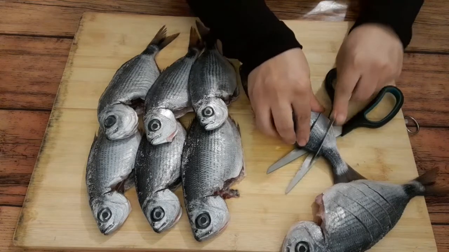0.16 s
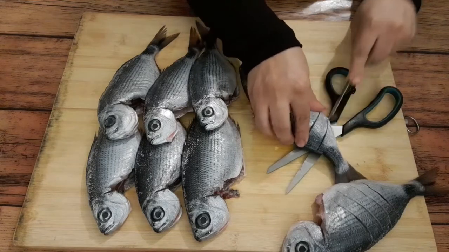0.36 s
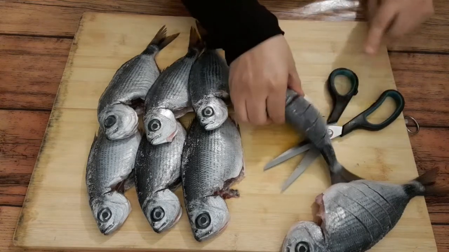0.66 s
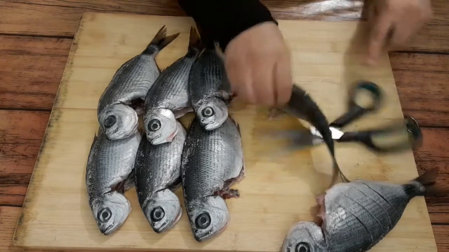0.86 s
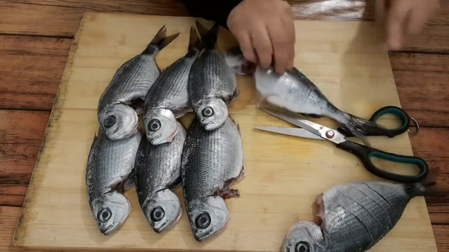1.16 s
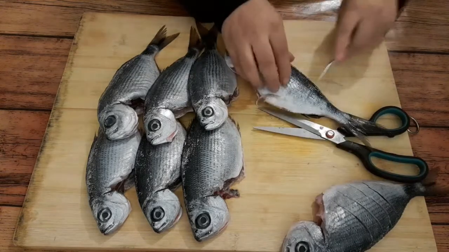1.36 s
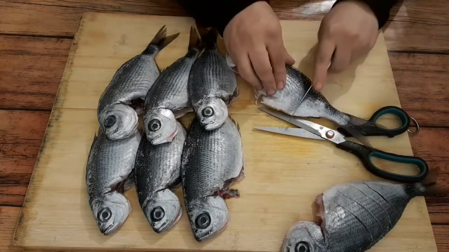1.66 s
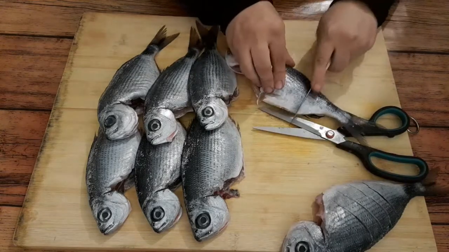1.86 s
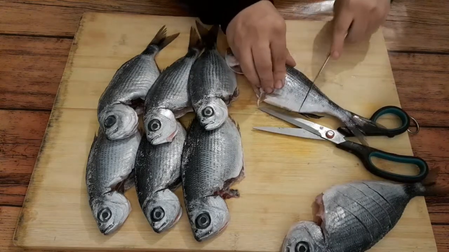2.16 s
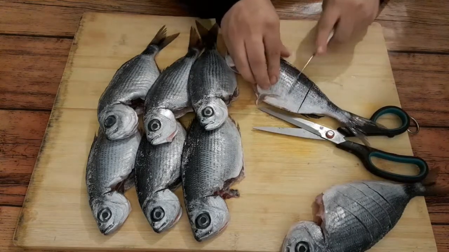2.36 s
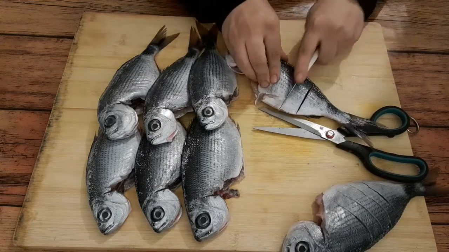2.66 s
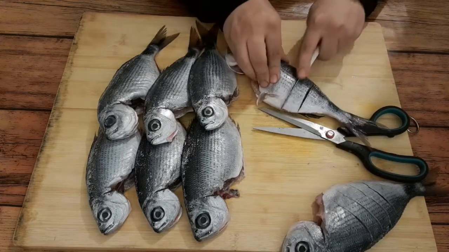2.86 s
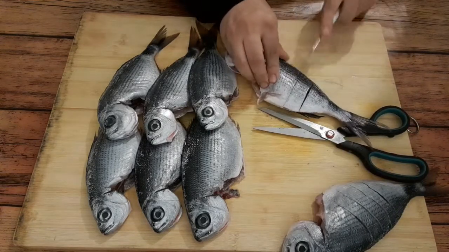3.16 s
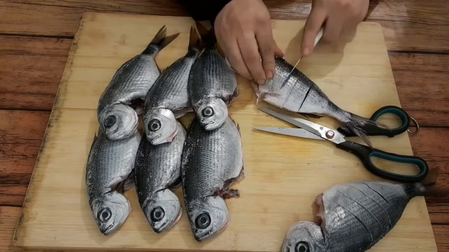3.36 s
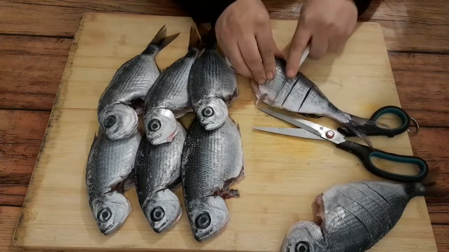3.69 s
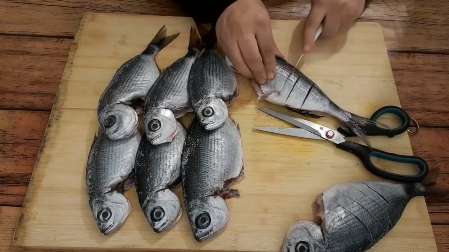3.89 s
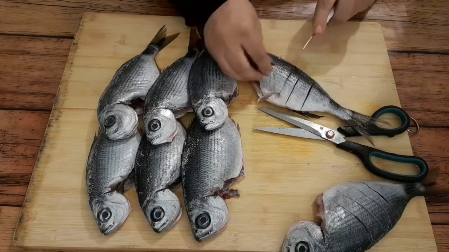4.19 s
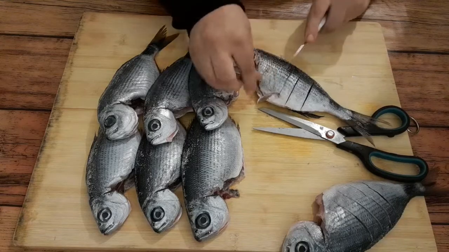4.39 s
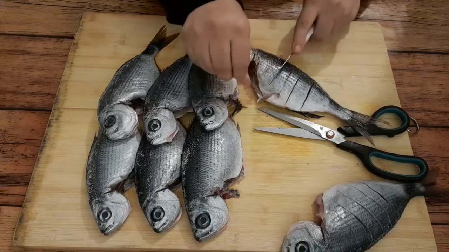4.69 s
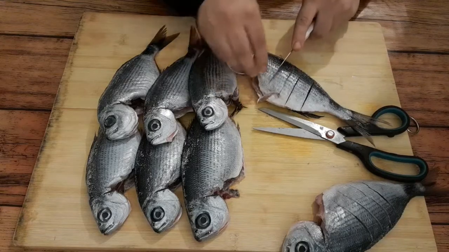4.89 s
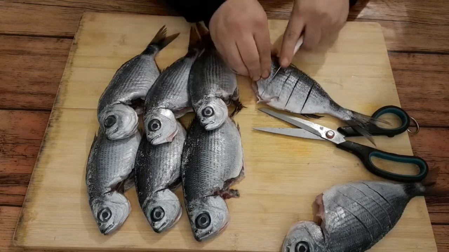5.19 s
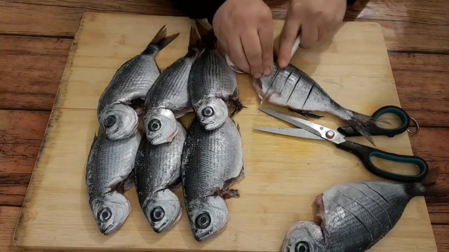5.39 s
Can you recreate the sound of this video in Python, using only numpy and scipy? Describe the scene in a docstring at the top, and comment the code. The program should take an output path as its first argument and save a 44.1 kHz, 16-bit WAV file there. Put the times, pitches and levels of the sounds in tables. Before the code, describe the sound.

Close handling of fish on a wooden board: wet drags, woody thumps, brief scissor buzz and light blade cuts over faint motor hum.

```python
"""Scoring fish in a quiet kitchen

A knife scores small fish on a wooden board, close under a two-port microphone.
The blade hisses through skin as shaped noise and ticks on scales and bone as short crackles.
Fish, hands and loose scissors knock, drag and rattle; board, table and steel ring as sets of fading sines.
A motor hums far off as wavering sines over steady air noise, and hits echo in the room.
"""
import sys
import numpy as np
from scipy import signal
from scipy.fft import rfft, irfft
from scipy.io import wavfile

SR = 44100
rng = np.random.default_rng(int(sys.argv[2]) if len(sys.argv) > 2 else 0)


def master_out(mix):
    """Clip the mix to full scale and print it as 16-bit PCM to the path in sys.argv[1]."""
    frames = np.transpose(np.atleast_2d(mix))
    ceiling = np.clip(frames, -1, 1)
    pcm = np.round(ceiling * 32767).astype(np.int16)
    wavfile.write(sys.argv[1], SR, pcm)


N = 244314   # length in samples
STEP = 40   # slow curves are worked out once every 40 samples

# How alike left and right are. Each row: pitch in Hz, likeness (0 unrelated, 1 the same).
LEFT_RIGHT_LIKENESS = [(25, 0.32), (60, 0.59), (125, 0.82), (250, 0.33), (500, 0.62), (1000, 0.029),
                       (2000, 0.037), (16000, 0.015)]


def coloured(spectrum, grain=1):
    """Stereo noise shaped by a spectrum, its sides alike by band; grain swells both together; rms 1."""
    hz = np.maximum(np.arange(N // 2 + 1) * SR / N, 1)
    mid, side = rfft(rng.standard_normal((2, N)) * grain)
    alike = np.clip(at_hz(LEFT_RIGHT_LIKENESS, hz), -1, 1)
    shared = np.sqrt(1 + alike) * mid
    opposed = np.sqrt(1 - alike) * side * [[1], [-1]]
    return rms_one(irfft((shared + opposed) * from_db(at_hz(spectrum, hz)), N))


# Strokes of blade, fish and fingers. Each row: start in seconds, rise in seconds, hold in seconds,
# blade hiss, wet drag, board rub and table rumble levels in dB, favoured board pitch in Hz,
# favoured table pitch in Hz.
STROKES = [(0.0, 0.0017, 0.028, -63, -64, -57.5, -56.5, 550, 118),
           (0.073, 0.059, .11, -66, -65, -56.5, -52, 556, 161),
           (0.281, 0.0063, 0.13, -58.5, -55, -50.5, -41, 535, 178),
           (0.452, 0.026, 0.14, -64.5, -66.5, -61, -55.5, 563, 136),
           (0.637, 0.051, 0.093, -60.5, -69, -68, -63.5, 494, 118),
           (0.775, 0.012, 0.038, -65, -48.5, -70, -56, 700, 150),
           (0.829, 0.036, 0.047, -61, -52, -49, -48.5, 653, 151),
           (0.924, 0.022, 0.046, -56, -53, -44, -46, 720, 185),
           (1.022, 0.022, .03, -61, -62, -50.5, -51, 530, 140),
           (1.15, .02, 0.14, -73, -85, -75, -68, 480, 104),
           (1.293, 0.069, 0.092, -64, -72.5, -69, -64, 510, 103),
           (1.41, 0.042, .06, -69.5, -69.5, -63.5, -58.5, 500, 100),
           (1.526, .03, 0.084, -69.5, -71, -70.5, -56.5, 480, 99),
           (1.645, .02, 0.12, -69, -73, -68.5, -60.5, 520, 111),
           (1.859, 0.042, 0.063, -60, -66, -60, -64.5, 700, 145),
           (1.983, 0.032, 0.021, -60, -59, -55.5, -56, 690, 175),
           (2.087, 0.0047, 0.061, -64, -64.5, -56, -44, 460, 103),
           (2.195, 0.017, 0.13, -72, -71.5, -71.5, -59.5, 500, 101),
           (2.348, 0.017, 0.3, -76, -90, -87, -83, 475, 100),
           (2.63, .06, 0.016, -61, -71, -64, -69, 510, 210),
           (2.81, 0.043, 0.04, -58, -62, -53, -59, 650, 164),
           (2.9, 0.016, .03, -69, -69, -57.5, -61, 600, 158),
           (2.96, 0.0076, 0.095, -56, -67, -51, -47, 700, 145),
           (3.035, 0.025, 0.032, -64, -58, -55.5, -41.5, 740, 159),
           (3.128, 0.022, 0.068, -75, -73, -71, -67, 620, 130),
           (3.235, .02, 0.14, -78.5, -80, -96, -75, 467, 100),
           (3.413, 0.037, 0.11, -70.5, -78.5, -82, -84, 485, 128),
           (3.519, 0.028, 0.095, -67, -64.5, -63, -56.5, 600, 162),
           (3.68, 0.041, 0.088, -58.5, -53.5, -54.5, -52.5, 680, 142),
           (3.81, 0.017, 0.14, -66, -72, -72, -51.5, 910, 131),
           (3.919, 0.0053, 0.041, -61.5, -56.5, -78, -45.5, 590, 148),
           (3.986, 0.0083, .04, -66.5, -70.5, -76, -56, 612, 202),
           (4.09, 0.049, .3, -89, -79, -70.5, -66, 500, 184),
           (4.515, 0.019, 0.091, -106, -103, -78, -59.5, 470, 96),
           (4.674, 0.032, 0.11, -88, -85, -83, -61, 470, 96),
           (4.947, 0.027, 0.11, -101, -88, -72.5, -73, 475, 118),
           (5.087, .04, 0.097, -74, -87, -76, -72, 465, 145),
           (5.213, 0.047, 0.039, -61, -65.5, -60, -53, 595, 140),
           (5.302, .02, 0.046, -83, -84, -70, -52.5, 505, 104),
           (5.408, 0.03, 0.037, -64, -70, -60, -62, 580, 168),
           (5.469, 0.031, .05, -67.5, -63, -56.5, -49.5, 600, 138)]
# Noise of the blade in skin. Each row: pitch in Hz, relative level in dB per Hz.
HISS_SPECTRUM = [(6000, -56), (8000, -7), (10000, -5.5), (12500, -2), (14500, -5), (16500, -4.5)]
# Rougher skin rasp, lower than the hiss. Each row: pitch in Hz, relative level in dB per Hz.
RASP_SPECTRUM = [(2600, -25), (3500, -7.5), (4500, -4.5), (6600, -5), (8000, -8.5), (10000, -47)]
# Wet fish dragged on wood. Each row: pitch in Hz, relative level in dB per Hz.
DRAG_SPECTRUM = [(410, -24), (700, -11), (757, -9), (905, -6), (971, -6), (1240, -5), (1600, -7),
                 (1880, -7), (2380, -10), (2840, -7.5), (3220, -11.5), (4500, -20.5), (5850, -36),
                 (9900, -120)]
# Ringing tones of the board. Each row: pitch in Hz, relative level in dB, seconds to fade by 60 dB.
BOARD_MODES = [(361, -7.5, 0.047), (460.4, -8, 0.047), (511.5, -6, 0.16), (552, 1.5, 0.021),
               (643, -1, 0.052), (704, -5, 0.05), (815, -6, 0.068), (911, -4, 0.058), (1060, -6.5, 0.028),
               (1260, -10, 0.032), (1402, -7.5, 0.16)]
# Ringing tones of the table. Each row: pitch in Hz, relative level in dB, seconds to fade by 60 dB.
TABLE_MODES = [(72.5, 3, 0.083), (90, 4.5, 0.071), (132, -1, 0.27), (157.4, -3.5, 0.18), (189.5, -5, 0.35),
               (223.8, -3.5, 0.25), (252.3, -2, 0.34), (316, -3.5, 0.074)]
HISS_FALL, DRAG_FALL, RUB_FALL, RUMBLE_FALL = 160, 164, 260, 240   # release after the hold, dB per s
RASP_DB, RASP_FROM_DRAG = -4, 0.14   # offset in dB; how far the rasp level leans from hiss to drag


def handling():
    """Blade in skin, wet fish on wood, and the board and table shaken by the rubbing."""
    hiss_db, drag_db, rub_db, rumble_db, board_hz, table_hz = np.transpose(STROKES)[3:]
    rasp_db = RASP_DB + hiss_db + RASP_FROM_DRAG * (drag_db - hiss_db)
    layers = [(hiss_db, HISS_FALL), (rasp_db, HISS_FALL), (drag_db, DRAG_FALL),
              (rub_db, RUB_FALL), (rumble_db, RUMBLE_FALL)]
    powers = [stroke_power(*layer) for layer in layers]
    hiss, rasp, drag, rub, rumble = [every_sample(np.sqrt(p.sum(axis=0))) for p in powers]

    # Overlapping strokes pull the favoured pitch according to their power.
    board_power, table_power = powers[3:]
    board_hz = every_sample(board_hz @ board_power / board_power.sum(axis=0))
    table_hz = every_sample(table_hz @ table_power / table_power.sum(axis=0))

    out = hiss * coloured(HISS_SPECTRUM, slips(50, spread_db=-0.5, decay_s=0.0034))
    out += rasp * coloured(RASP_SPECTRUM, slips(50, spread_db=-6.5, decay_s=0.0047))
    out += drag * coloured(DRAG_SPECTRUM, slips(50, spread_db=0.0, decay_s=0.0031))
    board_slips = slips(35, spread_db=1.0, decay_s=0.021)
    out += rub * rubbed(BOARD_MODES, board_slips, board_hz, narrow_db=4.5)
    table_slips = slips(20, spread_db=4.5, decay_s=0.016)
    out += rumble * rubbed(TABLE_MODES, table_slips, table_hz, narrow_db=5.5)
    return out


RISE_DB = 14   # climbed during a stroke's rise


def stroke_power(peak_db, fall_db_per_s):
    """Each stroke climbs, holds and dies away; one row of power a stroke, one value a step."""
    start, rise, hold = np.transpose(STROKES)[:3, :, None]
    age = np.arange(0, N + STEP, STEP) / SR - start
    rise = np.maximum(rise, 0.002)
    climb_db = RISE_DB * np.minimum(age / rise - 1, 0)
    fall_db = fall_db_per_s * np.maximum(age - rise - hold, 0)
    return from_db(np.maximum(peak_db[:, None] + climb_db - fall_db, -150)) ** 2


# Scales, bone and steel giving way. Each row: start in seconds, then hiss, rasp and dull levels in dB
# before each layer's trim, pitch of the dull part in Hz, left-right balance in dB (plus is left).
TICKS = [(0.112, -48.5, -64, -62, 1040, -2), (0.125, -51, -54.5, -45, 1390, 0),
         (0.2921, -45, -46.5, -31, 960, 0), (0.317, -33, -64, -36.5, 3100, 6.5),
         (0.3421, -39, -52, -32.5, 1380, 1), (0.413, -50, -55, -67, 2610, -5),
         (0.4476, -45, -64, -59, 1200, 6), (0.5438, -63, -56, -52, 1750, 0),
         (0.603, -57, -83, -70, 1250, 12), (0.636, -49, -67, -63, 1540, 6),
         (0.7865, -46, -45, -33, 3140, 2.5), (0.7967, -67, -58, -34, 1180, 8),
         (0.9692, -44.5, -50, -42, 2850, -6), (1.0077, -53, -50.5, -49, 2850, -6),
         (1.3186, -42, -75, -75, 1550, 3), (1.863, -59, -69, -66, 1500, -2),
         (1.9146, -52, -61, -57.5, 2940, 0.5), (1.978, -68, -71, -58, 1050, -3),
         (2.0177, -55, -50, -53, 1250, 1), (2.036, -43, -49, -43, 1040, -3),
         (2.132, -49, -56, -69, 1790, -6), (2.151, -40.5, -52.5, -43, 3270, 3.5),
         (2.1991, -57, -66, -53, 2140, 2), (2.633, -53, -67, -77, 1000, -2.5),
         (2.6963, -59, -54, -54, 2650, -4), (2.829, -51, -57.5, -52, 1210, -1),
         (2.8698, -50, -55, -47, 1130, -5), (2.9601, -29, -35, -31, 1140, 0),
         (3.042, -60, -48, -51, 2850, -1), (3.054, -43.5, -47.5, -35, 1000, 2),
         (3.557, -54, -61, -49, 1030, 4), (3.5668, -49, -54, -68, 1110, -2.0),
         (3.6577, -63, -61, -50, 2220, -2), (3.7083, -57, -51.5, -52, 2710, 4),
         (3.764, -51, -53, -57, 1700, -6), (3.804, -57, -70, -44, 1240, 9),
         (3.8376, -55, -49, -39.5, 1220, -2), (3.8794, -40.5, -42.5, -31.5, 2720, 0.5),
         (3.9334, -44, -40.5, -32.5, 1030, -3), (4.703, -57, -59.5, -63.5, 1840, -1),
         (5.1275, -65, -67, -90, 1900, 0), (5.249, -42.5, -51, -52, 2620, 0),
         (5.4217, -55, -56, -75, 1010, 0), (5.476, -61, -62, -67, 1680, 0.5)]
TICK_T60_S, SLIDE_T60_S = 0.013, 0.25   # seconds to fade by 60 dB: the snap, the blade sliding on after it
FOCUS_PER_KHZ, RING_CYCLES = 0.042, 17   # higher pitches stand out more; cycles to fade by 60 dB
# Slide level under a soft tick in dB, dB it shrinks per dB of a harder tick, level of the soft tick in dB
SLIDE_DB, SLIDE_SHRINKS, SOFT_TICK_DB = -12.5, 0.32, -54


def ticks():
    """Each tick is a snap of crackle with a weaker, longer slide: hiss, rasp and a dull resonance."""
    hiss, rasp, dull = np.zeros((3, 2, N))
    age = np.arange(4000) / SR
    crackle = coloured(DRAG_SPECTRUM)
    for s, hiss_db, rasp_db, dull_db, hz, pan_db in TICKS:
        i = round(s * SR)
        here = slice(i, i + 4000)
        sides = from_db([[pan_db / 2], [-pan_db / 2]])
        hardness_db = max(hiss_db, rasp_db, dull_db) - SOFT_TICK_DB
        slide_db = SLIDE_DB - SLIDE_SHRINKS * hardness_db
        snap = from_db(-60 * age / TICK_T60_S)
        slide = from_db(slide_db - 60 * age / SLIDE_T60_S)
        onset = 1 - np.exp(-age / 0.00011)
        fade = (sides * onset * (snap + slide))[:, :N - i]
        hiss[:, here] += from_db(hiss_db - 1.5) * fade
        rasp[:, here] += from_db(rasp_db + 1.0) * fade
        burst = crackle[:, here] * fade
        resonance = FOCUS_PER_KHZ * hz / 1000 * ring(burst, hz, RING_CYCLES / hz)
        dull[:, here] += from_db(dull_db - 3.0) * (0.74 * burst + resonance)
    return hiss * coloured(HISS_SPECTRUM) + rasp * coloured(RASP_SPECTRUM) + dull


# Blows on the board. Each row: start in seconds, board level in dB before trim, favoured board pitch in Hz,
# table level in dB before trim, favoured table pitch in Hz.
KNOCKS = [(0.124, -46, 530, -46.5, 220), (0.291, -30, 510, -28, 193), (0.316, -26.5, 504, -24.5, 184),
          (0.342, -30, 505, -29.5, 178), (0.346, -28, 1350, -48, 180), (0.361, -39, 505, -53, 180),
          (0.444, -57, 480, -41.5, 140), (0.521, -43, 480, -54, 146.3), (0.786, -31, 1070, -51, 127),
          (0.796, -33, 584, -47, 149), (0.814, -27, 626, -42, 153), (0.847, -34, 524, -49, 95),
          (0.885, -26, 714, -65, 132), (0.912, -32, 666, -36.5, 144), (0.956, -34, 610, -48, 250),
          (0.984, -37, 506, -41, 230), (1.043, -33, 535, -40, 132), (1.068, -40, 431, -43.5, 152),
          (1.588, -66, 447, -53, 88.8), (1.893, -45, 724, -81, 108), (1.976, -45, 616, -58, 105),
          (2.097, -50, 480, -49, 149), (2.109, -38.5, 440, -49, 92.5), (2.146, -50, 466, -51, 80),
          (2.165, -54, 407, -41, 82), (2.195, -45, 442, -48, 127), (2.695, -41, 450, -62.5, 229),
          (2.87, -42, 646, -56, 237), (2.96, -32.5, 705, -49, 132), (3.041, -33.5, 750, -42.5, 137),
          (3.051, -31, 865, -40.5, 192), (3.073, -41.5, 880, -45.5, 124), (3.566, -38.5, 620, -46, 252),
          (3.763, -35.5, 680, -48, 120), (3.837, -33, 990, -51, 85), (3.881, -39, 1250, -44.5, 130),
          (3.932, -25.5, 630, -29.5, 146), (3.994, -50, 636, -42.5, 234), (5.254, -56, 401, -49, 96),
          (5.479, -45, 590, -64, 94)]


def knocks():
    """Board and table answer each blow with their own ringing tones."""
    s, board_db, board_hz, table_db, table_hz = np.transpose(KNOCKS)
    board = struck(BOARD_MODES, s, board_db - 8, board_hz,
                   narrow_db=19.0, spread_db=2.5, contact_s=0.00019)
    table = struck(TABLE_MODES, s, table_db - 0.5, table_hz,
                   narrow_db=33.0, spread_db=0.0, contact_s=0.002)
    return board + table


# The loose scissors buzz when the board is shaken. Each row: start in seconds, level of the blade tones in dB,
# level of the tip tones in dB, seconds to fade by 60 dB.
RATTLES = [(0.215, -67, -81, .25), (0.293, -68, -49.5, 0.11), (0.322, -44, -54, 0.13),
           (0.343, -55, -57, 0.24), (0.41, -80, -60, 0.22), (0.788, -44, -71, 0.06), (0.82, -72, -81, .8),
           (0.971, -63, -71, 0.086), (1.006, -46.5, -74, 0.08), (3.043, -52, -54, 0.32),
           (3.888, -50, -48, 0.06), (3.94, -55, -56, 0.22)]
# Ringing tones of the scissors, first four for the blades and the rest for the tips.
# Each row: pitch in Hz, relative level in dB, seconds to fade by 60 dB.
SCISSOR_MODES = [(2020, -8, 0.032), (2600, -8.5, 0.03), (2874, 0.5, 0.017), (3490, -6.5, 0.03),
                 (4760, 12, 0.027), (5180, 12, 0.021), (5450, 11, 0.015)]


def rattle():
    """The blades chatter in quick uneven touches that drive the steel's lower and upper modes, then settle."""
    t = np.arange(N) / SR
    blade, tip = np.zeros((2, N))
    for s, blade_db, tip_db, t60 in RATTLES:
        settling = (t >= s) * from_db(-60 * np.clip(t - s, 0, t60 * 2) / t60)
        blade += from_db(blade_db) * settling
        tip += from_db(tip_db) * settling
    chatter = slips(300, spread_db=1.5, decay_s=0.001)
    return blade * rubbed(SCISSOR_MODES[:4], chatter) + tip * rubbed(SCISSOR_MODES[4:], chatter)


# Steady air noise. Each row: pitch in Hz, relative level in dB per Hz.
ROOM_SPECTRUM = [(15, -65), (30, -7.5), (60, -1.5), (90, 0.5), (170, -18.5), (240, -13.5), (350, -9.5),
                 (440, -14), (600, -16), (1100, -24), (1700, -22.5), (3000, -33.5), (4700, -30),
                 (5400, -22.5), (6200, -30), (16500, -30.5)]
# Tones of the far motor. Each row: pitch in Hz, middle of its wavering rms level in dB.
HUM_LINES = [(97, -94.5), (145, -80.5), (199, -84.5), (242, -92.5), (393, -87), (444, -77.5), (493, -79)]
ROOM_TONE_DB = -68.5   # rms


def room_tone():
    """Steady air noise and a motor hum whose lines waver in level and pitch."""
    t = np.arange(N) / SR
    hum = np.zeros(N)
    for hz, db in HUM_LINES:
        height = np.sqrt(2) * from_db(db + 2.0 * drift(11.0))
        hum += height * np.sin(2 * np.pi * hz * t + 0.57 * drift(2.35))
    return from_db(ROOM_TONE_DB) * coloured(ROOM_SPECTRUM) + hum


KITCHEN_T60_S, WALL_CUT_HZ = 0.41, 11400   # echo fade by 60 dB in the bass; treble loss per round


def kitchen(x):
    """Six feedback delays a side, duller on every round, stepped block by block."""
    out = np.zeros((2, N))
    dull = np.exp(-2 * np.pi * WALL_CUT_HZ / SR)
    lags = (rng.uniform(0.0081, 0.03, 12) * SR).astype(int)
    for k, lag in enumerate(lags):
        loop, state = x.copy(), [0.]
        gain = from_db(-60 * lag / SR / KITCHEN_T60_S)
        for i in range(lag, N, lag):
            back, state = signal.lfilter([gain * (1 - dull)], [1, -dull], loop[i - lag:i], zi=state)
            loop[i:i + lag] += back[:N - i]
        out[k % 2] += (loop - x) * (-1) ** (k // 2)
    return out


def rubbed(modes, grain, favoured_hz=None, narrow_db=0.0):
    """Noise under friction drives each mode; contact may favour modes near one pitch; rms near 1."""
    force = coloured([(20, 0), (20000, 0)], grain)
    out, power = 0, 0
    for k, (hz, db, t60) in enumerate(modes):
        if favoured_hz is not None:
            db = db - narrow_db * np.abs(np.log2(hz / favoured_hz))   # narrow_db is lost per octave away
        gain = from_db(db)
        out = out + gain * rms_one(ring(force, hz, t60)) * (-1) ** k
        power = power + gain ** 2
    return out / np.sqrt(power)


def struck(modes, times, peak_db, favoured_hz, narrow_db, spread_db, contact_s):
    """The place of a blow favours modes near one pitch; signs and strengths vary; contact is a soft push."""
    at = np.round(times * SR).astype(int)
    out = np.zeros((2, N))
    for hz, db, t60 in modes:
        chance = rng.standard_normal((len(at), 4))
        level_db = peak_db + db - narrow_db * np.abs(np.log2(hz / favoured_hz))
        vary_db = spread_db * (chance[:, 0] + 0.56 * chance[:, 1:3].T)   # shared part, then each side's own
        clicks = np.zeros((2, N))
        clicks[:, at] = np.sign(chance[:, 3]) * from_db(level_db + vary_db)
        out += ring(clicks, hz, t60)
    push = np.hanning(max(round(contact_s * SR), 1) + 2)[1:-1]
    return signal.lfilter(push / push.sum(), [1], out)


def slips(per_s, spread_db, decay_s):
    """Friction lets go in uneven slips: a steady base plus random short bursts."""
    strength = from_db(spread_db * np.minimum(rng.exponential(1, N), 4))
    born = (rng.random(N) < per_s / SR) * strength
    return 1 + signal.lfilter([1], [1, -np.exp(-1 / (decay_s * SR))], born)


def ring(clicks, hz, t60):
    """A unit click sets a fading sine ringing from a height of 1."""
    r, w = from_db(-60 / (t60 * SR)), 2 * np.pi * hz / SR
    return signal.lfilter([0, np.sin(w)], [1, -2 * r * np.cos(w), r * r], clicks + 1e-18)


def drift(rate):
    """Slow chance of spread 1: coarse noise through a double one-pole low-pass at rate Hz, run in."""
    r = np.exp(-2 * np.pi * rate * STEP / SR)
    noise = rng.standard_normal(N // STEP + 2002)
    slow = signal.lfilter([1], [1, -2 * r, r * r], noise)[2000:]
    return every_sample(rms_one(slow))


def every_sample(coarse):
    """Draws straight lines between the values of a slow curve."""
    return np.interp(np.arange(N) / STEP, np.arange(len(coarse)), coarse)


def at_hz(points, hz):
    """Reads a table's second column at any pitch, in straight lines over log pitch."""
    table_hz, value = np.transpose(points)
    return np.interp(np.log(hz), np.log(table_hz), value)


def from_db(db):
    """Turns decibels into an amplitude factor."""
    return 10 ** (np.asarray(db) / 20)


def rms_one(x):
    """Scales a sound to an rms of 1."""
    return x / np.sqrt(np.mean(x ** 2) + 1e-20)


def scene():
    """Hits get the room's answer, weak in the bass; rubbing, rattle and room tone are added to them."""
    hits = knocks() + ticks()
    airborne = signal.lfilter(*signal.butter(2, 300, "high", fs=SR), hits.mean(axis=0))
    return hits + from_db(-13.0) * kitchen(airborne) + handling() + rattle() + room_tone()


PORT_LAG, PORT_PAN_DB = 3, -1.5   # left port's delay in samples, left level against right in dB
BASS_CUT_HZ, TOP_CUT_HZ = 32, 16200


def record(dry):
    """The left port hears later and weaker; the capsule loses the deepest bass and the top is cut."""
    left = np.pad(dry[0], (PORT_LAG, 0))[:N] * from_db(PORT_PAN_DB / 2)
    right = dry[1] * from_db(-PORT_PAN_DB / 2)
    bass_cut = signal.butter(2, BASS_CUT_HZ, "high", fs=SR, output="sos")
    top_cut = signal.cheby2(20, 50, TOP_CUT_HZ, fs=SR, output="sos")
    return signal.sosfilt(top_cut, signal.sosfilt(bass_cut, np.array([left, right])))


dry = scene()
out = record(dry)
master_out(out)
```